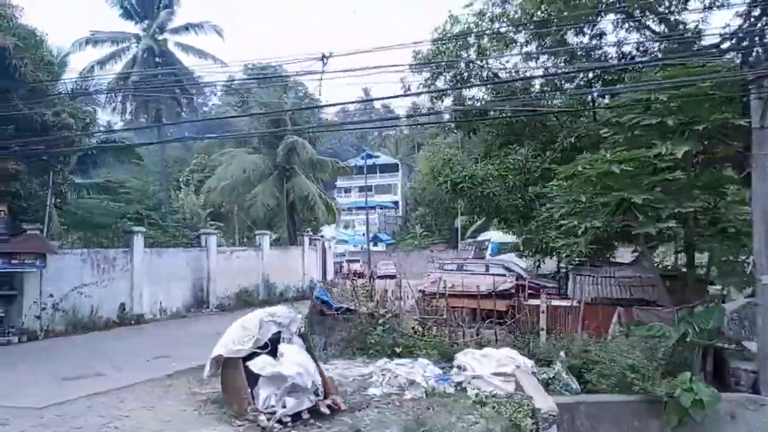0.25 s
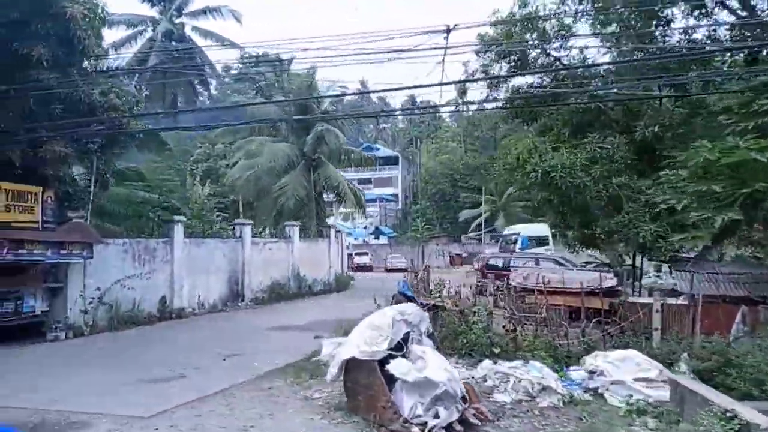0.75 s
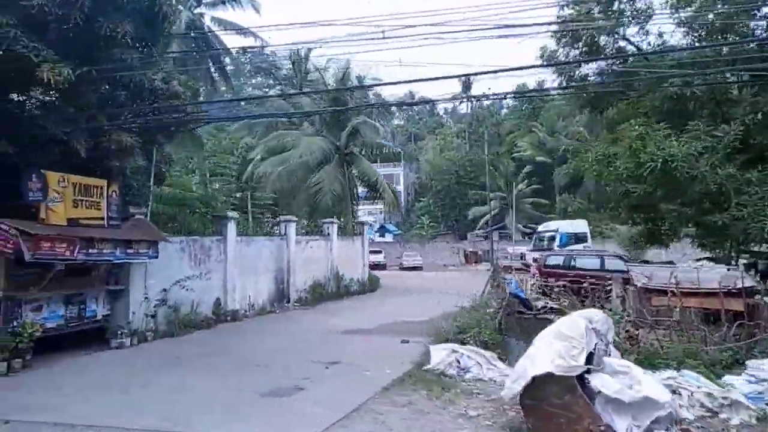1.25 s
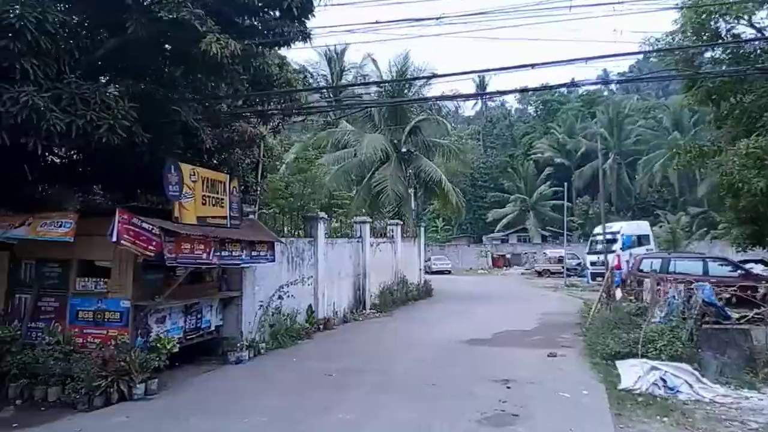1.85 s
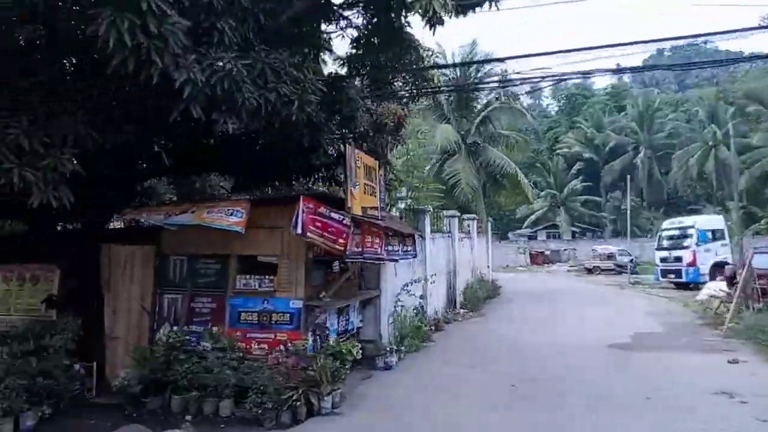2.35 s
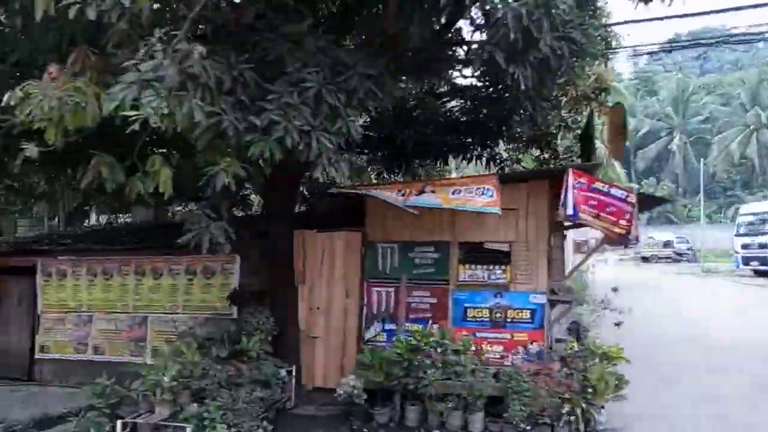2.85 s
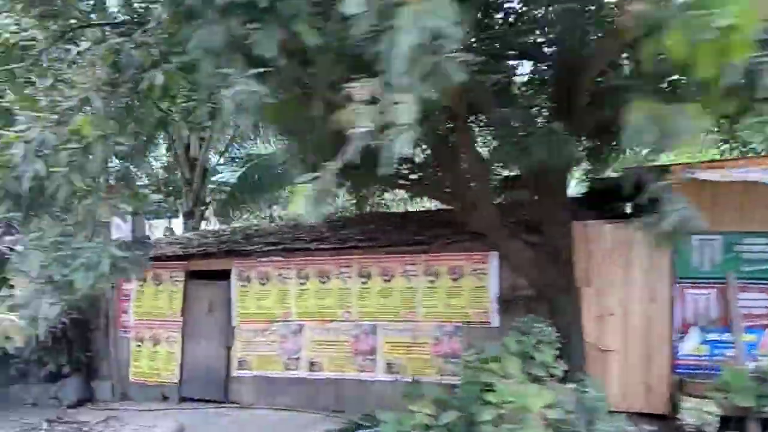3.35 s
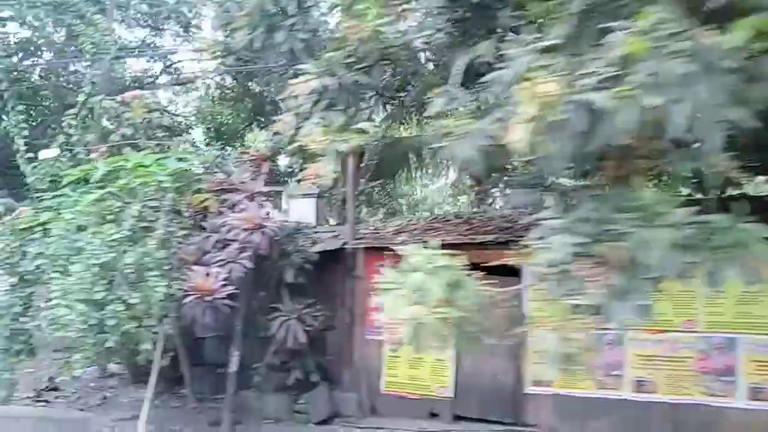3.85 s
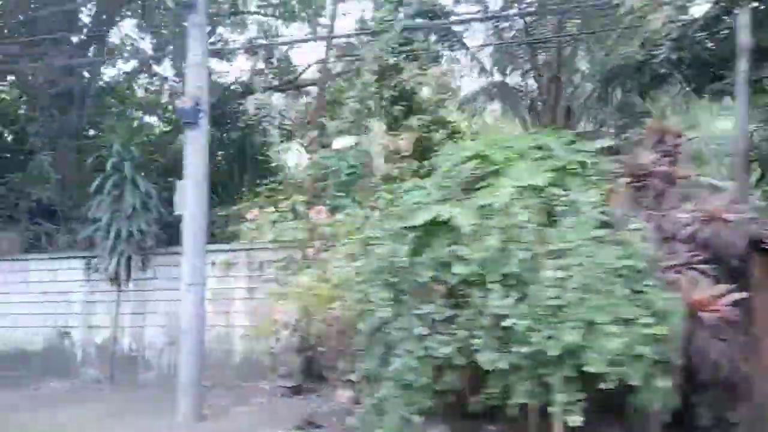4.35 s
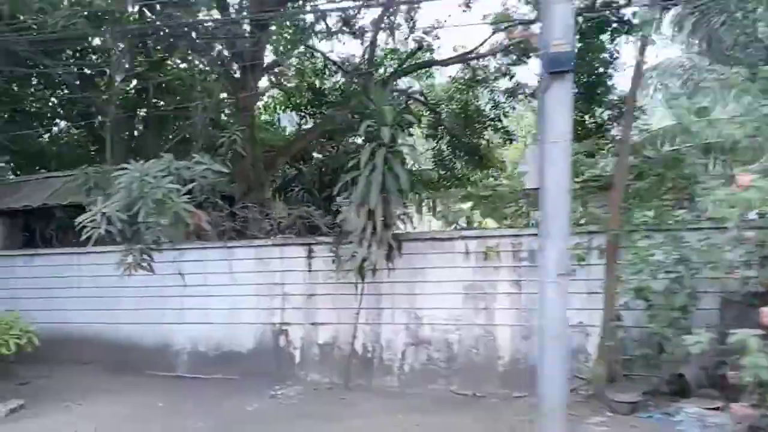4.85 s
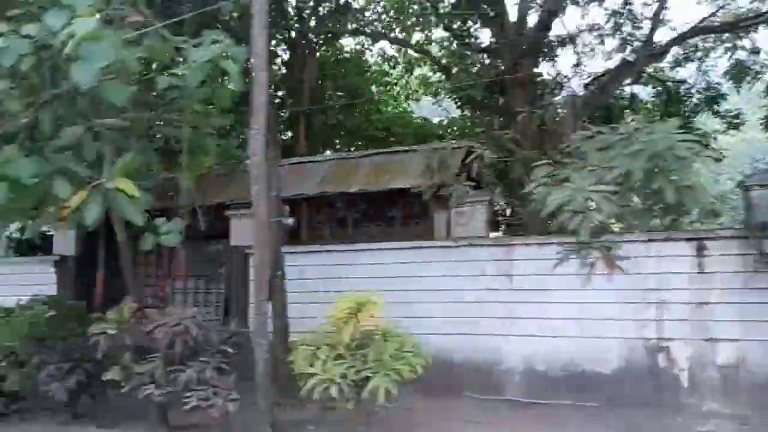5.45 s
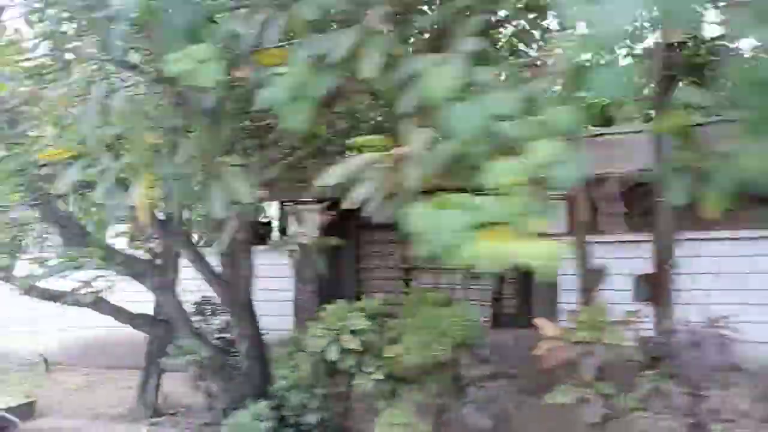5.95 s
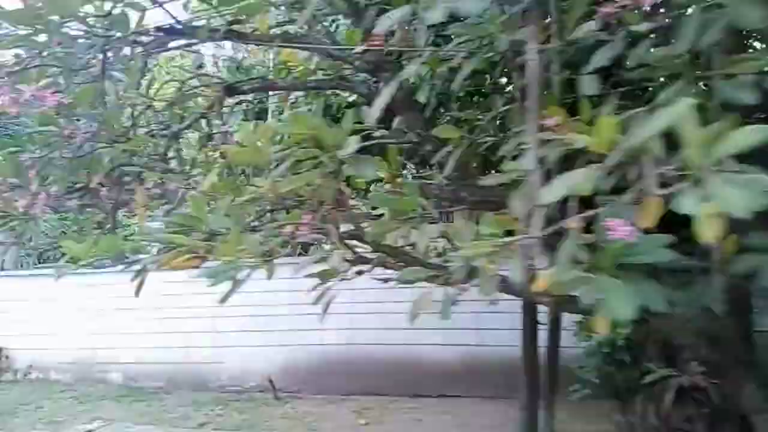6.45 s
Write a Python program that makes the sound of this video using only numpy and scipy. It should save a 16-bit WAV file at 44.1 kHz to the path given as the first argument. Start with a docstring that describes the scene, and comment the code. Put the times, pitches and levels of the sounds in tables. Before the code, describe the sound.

A close, slightly overloaded microphone rides on a motorbike outdoors. The engine's dull, rapid putter rises steadily in pitch, with metallic clatter over it. A two-note horn chirps once, then blares twice in fast succession, distorted, echoing off walls and foliage. Afterwards the engine swells back, fittings rattle, wind buffets in low lumps. In the last second the revs sag, a gust builds and thin squeaks appear.

```python
"""Motorbike and horn in a village bend

A single-cylinder motorbike gathers revs until the throttle closes near the end: exhaust orders, bodywork,
clatter and hiss all follow one firing rate. Two buzzing diaphragms give a short beep, then a double toot;
the walls echo them, and the recorder ducks its gain and overloads. Bumps ring the loose fittings, a few
thin squeaks come as the bike slows, and coloured noise in lumps buffets the microphone as wind.
"""
import sys
import numpy as np
from scipy import signal
from scipy.fft import rfft, irfft, next_fast_len
from scipy.io import wavfile
from scipy.ndimage import uniform_filter1d

SR = 44100
rng = np.random.default_rng(int(sys.argv[2]) if len(sys.argv) > 2 else 0)


def log_audio(samples):
    """Write samples as a 16-bit WAV file to the path given in sys.argv[1]."""
    # one column per channel
    frames = np.atleast_2d(samples).T
    # limit to full scale, then quantise
    limited = np.clip(frames, -1, 1)
    pcm = np.round(limited * 32767).astype(np.int16)
    wavfile.write(sys.argv[1], SR, pcm)


N = 295117
TIME = np.arange(N) / SR
START_HZ = 27.1  # firings per second at the start
SHUT_S = 5.86  # the throttle closes

# horn presses: (time [s], length [s], high horn [Hz], its relative level [dB], low horn [Hz],
# its relative level [dB], level of the boom at the high horn's fundamental [dB])
PRESSES = [(1.828, 0.026, 534, -2, 486.8, 0, -5), (2.601, 0.043, 527.7, 4, 469.7, 2.5, 13),
           (2.692, 0.053, 524.3, 3.5, 413.9, 0.5, 12)]


def from_db(db):
    """Decibels to an amplitude factor."""
    return 10 ** (np.asarray(db) / 20)


def rms_one(x):
    """The signal scaled to rms 1."""
    return x / np.sqrt(np.mean(x ** 2) + 1e-20)


def at_hz(points, hz):
    """A spectrum in dB read on a log-frequency axis."""
    point_hz, db = np.transpose(points)
    return np.interp(np.log(np.maximum(hz, 1)), np.log(point_hz), db)


def drift(rate_hz):
    """Slow chance with spread about 1: noise through two equal low-pass poles at the given corner."""
    step = 40  # samples between computed points
    r = np.exp(-2 * np.pi * rate_hz * step / SR)
    chance = rng.standard_normal(N // step + 2002)
    slow = signal.lfilter([1], [1, -2 * r, r * r], chance)[2000:]  # skip the filter's start-up
    return np.interp(np.arange(N) / step, np.arange(len(slow)), rms_one(slow))


def coloured(x, spectrum):
    """A signal given a smooth spectrum; rms 1."""
    size = next_fast_len(N + SR // 4)
    hz = np.arange(size // 2 + 1) * SR / size
    shaped = rfft(x, size) * from_db(at_hz(spectrum, hz))
    return rms_one(irfft(shaped, size)[:N])


def noise(spectrum):
    """Steady noise of the given colour; rms 1."""
    return coloured(rng.standard_normal(N), spectrum)


def resonance(x, hz, width_hz):
    """Two-pole band with gain about 1 on top."""
    r = np.exp(-np.pi * width_hz / SR)
    zeros = np.array([1, 0, -1]) * (1 - r * r) / 2
    poles = [1, -2 * r * np.cos(2 * np.pi * hz / SR), r * r]
    return signal.lfilter(zeros, poles, x + 1e-18)


def ring(clicks, hz, t60):
    """A unit click sets a decaying sine of starting height 1 ringing; it falls 60 dB in t60 seconds."""
    r = from_db(-60 / (t60 * SR))
    w = 2 * np.pi * hz / SR
    return signal.lfilter([0, np.sin(w)], [1, -2 * r * np.cos(w), r * r], clicks + 1e-18)


def swell(start, length, rise_s, fall_s):
    """A driven vibration builds up towards 1 while driven, then rings out."""
    age = np.maximum(TIME - start, 0)
    since_end = np.maximum(age - length, 0)
    return (1 - np.exp(-age / rise_s)) * np.exp(-np.minimum(since_end / fall_s, 50))


def revs():
    """Firings per second: an even climb in one gear and a quicker sag, rounded by the flywheel."""
    climb_hz_per_s, sag_hz_per_s, flywheel_s = 6.2, 25, 0.15
    climb = climb_hz_per_s * np.minimum(TIME, SHUT_S)
    sag = sag_hz_per_s * np.maximum(TIME - SHUT_S, 0)
    return uniform_filter1d(START_HZ + climb - sag, size=int(flywheel_s * SR), mode="nearest")


def ride_db(law):
    """Level of a sound that grows with the revs and drops as the throttle closes."""
    throttle_lag_s = 0.082
    # the rider briefly eases the throttle: (time [s], length [s], share closed [0-1])
    eases = [(1.955, 0.32, 0.35), (2.804, 0.37, 0.38), (4.2, 0.88, 0.29)]
    start_db, per_doubling_db, shut_db, die_s = law
    closed = sum(share * swell(s, length, throttle_lag_s, throttle_lag_s) for s, length, share in eases)
    closed = closed + 1 - np.exp(-np.maximum(TIME - SHUT_S, 0) / die_s)
    return start_db + per_doubling_db * np.log2(revs() / START_HZ) - shut_db * closed


def exhaust_note(firing_hz, phase, waver_db=2.5):
    """Each order of the firing rate swells as the rising revs carry it through a silencer resonance."""
    # exhaust through the silencer: (frequency [Hz], relative level of an order that falls there [dB])
    silencer = [(28, -60.5), (42, -33), (52, -26.5), (64, -28), (80, -27.5), (98, -21.5), (125, -24),
                (148, -37.5), (175, -28), (205, -30.5), (232, -35), (262, -31.5), (308, -27), (350, -46),
                (415, -33.5), (470, -37.5)]
    # strength of each order: (multiple of the firing rate [1], relative level [dB])
    order_mix = [(1, 1), (2, -0.5), (3, -2), (4, -9.5), (5, -8), (6, -5), (8, -3.5)]
    # ride law: (relative level at the starting revs [dB], rise per doubling of revs [dB],
    # loss with the throttle closed [dB], time constant of that loss [s])
    exhaust_law = (-1.5, 2.5, 11.5, 0.4)
    throttle_db = ride_db(exhaust_law)
    note = np.zeros(N)
    for k, db in order_mix:
        level_db = throttle_db + db + at_hz(silencer, k * firing_hz) + waver_db * drift(11.0)
        tone = np.sin(k * phase + rng.uniform(0, 2 * np.pi))
        note += np.sqrt(2) * from_db(level_db) * tone
    return note


def bodywork(cycles, uneven_db=1.0, knock_hz=2000):
    """Every firing, each a little uneven, gives a dull knock that rings silencer and bodywork; rms 1."""
    # silencer and bodywork modes: (frequency [Hz], width [Hz], relative level [dB])
    modes = [(186, 54, -15), (200, 65, -6), (270, 57, -3.5), (296.4, 23, 1), (422, 50, -5), (921, 35, -7.5),
             (1210, 100, -29)]
    firings = np.diff(np.floor(cycles), prepend=0) * from_db(uneven_db * drift(59))
    dull = signal.butter(2, knock_hz, fs=SR, output="sos")
    knocks = signal.sosfilt(dull, firings + 1e-18)
    return rms_one(sum((-1) ** k * from_db(db) * resonance(knocks, hz, width)
                       for k, (hz, width, db) in enumerate(modes)))


def engine(body_db=-0.5, clatter_db=2.5, throb=0.037, crank_throb=0.042, hiss_db=6.0):
    """Every firing pushes the exhaust, knocks the bodywork and sets off a burst of mechanical noise."""
    # colour of the clatter: (frequency [Hz], relative level [dB per Hz])
    clatter_colour = [(300, -8), (500, 1.5), (760, 0.5), (940, 2), (1150, 2.5), (1400, -2.5), (1900, -1),
                      (2400, -2), (3000, -8), (4000, -13), (4600, -24), (5400, -41), (8000, -59)]
    # colour of the hiss: (frequency [Hz], relative level [dB per Hz])
    hiss_colour = [(3000, -5), (5000, 2), (5500, -4.5), (6300, 1), (7200, -2), (8300, -5), (9000, -14.5),
                   (10000, -22.5), (13000, -25.5), (15500, -24)]
    # ride laws of body with clatter, and of hiss: (relative level at the starting revs [dB],
    # rise per doubling of revs [dB], loss with the throttle closed [dB], time constant of that loss [s])
    clatter_law = (-27.5, 2, 7, 0.24)
    hiss_law = (-64.5, 5.5, 8, 0.6)
    firing_hz = revs()
    cycles = np.cumsum(firing_hz * (1 + 0.00602 * drift(13.96))) / SR
    phase = 2 * np.pi * cycles
    # the crank turns twice for each firing, so the clatter throbs at both rates
    throbbing = np.exp(throb * np.cos(phase) + crank_throb * np.cos(2 * phase))
    bursts = rms_one(throbbing * from_db(0.85 * drift(25)))
    clatter = from_db(clatter_db) * noise(clatter_colour) * bursts
    # a jolt makes the machine clatter up to 4.5 dB louder for a moment
    load_db = ride_db(clatter_law) + 4.5 * swell(0.23, 0.046, 0.015, 0.022)
    mechanical = from_db(load_db) * (from_db(body_db) * bodywork(cycles) + clatter)
    hiss = from_db(ride_db(hiss_law) + hiss_db) * noise(hiss_colour) * bursts
    return exhaust_note(firing_hz, phase) + mechanical + hiss


def diaphragm(hz, pitch_bend, harmonics, jitter, flutter_db=1.85):
    """A buzzing horn disc: 26 harmonics whose period wanders as the contact breaker chatters."""
    cycles = np.cumsum(hz * pitch_bend * (1 + jitter * drift(155.4))) / SR
    grid = np.linspace(0, 1, 512)
    k = np.arange(1, 27)[:, None]
    lags = rng.uniform(0, 2 * np.pi, k.shape)
    partials = from_db(at_hz(harmonics, k * hz)) * np.sin(2 * np.pi * k * grid + lags)
    period = np.sum(partials, axis=0)
    return np.interp(cycles % 1, grid, period) * from_db(flutter_db * drift(70))


def horn(rise_s=0.0068, low_rise_s=0.013, fall_s=0.013, boom_rise_s=0.014, boom_fall_s=0.021,
         sharp=.012, settle_s=0.015, rasp_db=-5.0):
    """Two diaphragms start a little sharp and buzz together; the high one's boom outlasts the buzz."""
    # harmonics of the high and of the low horn: (frequency [Hz], relative level [dB])
    high_harmonics = [(525, -4.5), (1050, -7.5), (1580, -5), (2110, -3.5), (2640, -6), (3160, -13.5),
                      (3700, -24), (4220, -16), (5270, -46), (8000, -46), (14000, -76)]
    low_harmonics = [(420, -2), (830, -7), (970, 1.5), (1400, -2.5), (1900, -6), (2400, -9), (2950, -8.5),
                     (3900, -13), (4400, -23), (5300, -30), (9000, -55)]
    # buzz of the contact breaker, heard as rasp: (frequency [Hz], relative level [dB per Hz])
    rasp_colour = [(500, -15), (1050, -6), (1600, -4), (2300, -3.5), (3200, -6), (4300, -21), (5400, -39),
                   (8000, -43), (14000, -62)]
    high, low, boom = np.zeros((3, N))
    rasp = from_db(rasp_db) * noise(rasp_colour)
    for s, length, high_hz, high_db, low_hz, low_db, boom_db in PRESSES:
        pitch_bend = 1 + sharp * np.exp(-np.clip((TIME - s) / settle_s, 0, 20))
        high_buzz = diaphragm(high_hz, pitch_bend, high_harmonics, jitter=0.01036) + rasp
        low_buzz = diaphragm(low_hz, pitch_bend, low_harmonics, jitter=0.018)
        fundamental = np.sin(2 * np.pi * np.cumsum(high_hz * pitch_bend) / SR)
        high += from_db(high_db) * swell(s, length, rise_s, fall_s) * high_buzz
        low += from_db(low_db) * swell(s, length, low_rise_s, fall_s) * low_buzz
        boom += from_db(boom_db) * swell(s, length, boom_rise_s, boom_fall_s) * fundamental
    return high, low, boom


def plunger(level_db=-7.5, lag_s=0.00397):
    """The first three hard knocks of each press, one per cycle, ring the horn's disc and housing."""
    # modes of disc and housing: (frequency [Hz], relative level [dB], 60 dB decay time [s])
    disc_modes = [(1008, 0.5, 0.08), (1083, 4, 0.13), (1383, 8.5, 0.11), (1660, -1, 0.066),
                  (2204, -0.5, 0.23)]
    knocks = np.zeros(N)
    for s, _, high_hz, high_db, *_ in PRESSES:
        at = ((s + lag_s + np.arange(3) / high_hz) * SR).astype(int)
        knocks[at] = from_db(high_db + level_db)
    return sum((-1) ** k * ring(from_db(db) * knocks, hz, t60)
               for k, (hz, db, t60) in enumerate(disc_modes))


def roadside(x, tail_db=-4.0, t60=0.45, bend_db=-9.0, smear_s=0.00012):
    """Walls throw back a few echoes, foliage a diffuse tail; both weaken once the bike has turned away."""
    # walls and house fronts: (delay [s], level [dB])
    walls = [(0.016, -18), (.043, -12), (.071, -15), (.098, -12.5), (.121, -16.5)]
    t = np.arange(SR) / SR
    response = rng.standard_normal(SR) * from_db(-60 * t / t60) * (1 - np.exp(-t / 0.014))
    response *= from_db(tail_db) / np.linalg.norm(response)
    for delay, db in walls:
        response[int(delay * SR)] += from_db(db)
    facing = from_db(np.interp(TIME, [2.0, 2.5], [0, bend_db]))
    returned = signal.fftconvolve(x * facing, response)[:N]
    # the echo paths stretch and shrink as the bike moves, which blurs the pitch
    return np.interp(TIME + smear_s * drift(22), TIME, returned)


def rattles(level_db=13.5, chatter_s=0.0048):
    """Bumps set off brief bursts of tiny contacts that ring the fittings; rough patches keep them going."""
    # ticks over sharp bumps: (time [s], relative level [dB])
    ticks = [(0.5197, -41), (1.6402, -38), (3.3917, -35), (4.0801, -32.5), (4.9896, -39), (5.0888, -37),
             (6.0791, -31.5), (6.1574, -35), (6.4994, -40), (6.5765, -37)]
    # modes of the loose fittings: (frequency [Hz], relative level [dB], 60 dB decay time [s])
    fittings = [(2331, -10, .008), (3040, 3.5, 0.0054), (3920, 0, 0.01), (4410, -9, 0.011),
                (6240, -14, 0.0053), (6940, -19, 0.0053), (7660, -19.5, 0.0054)]
    # rough patches: (time [s], length [s], relative level [dB])
    shakes = [(3.40, 0.044, -49), (4.057, 0.07, -49.5)]
    # fainter ticks come at random: 4 per second on average, level spread 3.5 dB
    struck = rng.random(N) < 4 / SR
    bumps = struck * from_db(-44 + 3.5 * rng.standard_normal(N))
    for s, db in ticks:
        bumps[int(s * SR)] = from_db(db)
    r = np.exp(-1 / (chatter_s * SR))
    chatter = from_db(level_db) * signal.lfilter([np.sqrt(1 - r * r)], [1, -r], bumps + 1e-18)
    shaking = sum(from_db(db) * swell(s, length, 0.01, 0.015) for s, length, db in shakes)
    contacts = (chatter + shaking) * rng.standard_normal(N)
    return sum((-1) ** k * ring(from_db(db) * contacts, hz, t60)
               for k, (hz, db, t60) in enumerate(fittings))


def brake(waver=0.017):
    """Thin squeaks as the bike slows: short sines of unsteady pitch."""
    # faint squeaks: (time [s], length [s], frequency [Hz], level [dB])
    squeaks = [(5.86, 0.085, 11900, -61), (5.94, .14, 11460, -60), (6.132, 0.06, 11450, -62),
               (6.593, 0.032, 5075, -43), (6.634, 0.025, 3100, -28)]
    total = np.zeros(N)
    for s, length, hz, db in squeaks:
        cycles = np.cumsum(hz * (1 + waver * drift(150))) / SR
        total += from_db(db) * swell(s, length, 0.031, 0.01) * np.sin(2 * np.pi * cycles)
    return total


def wind(gust_rumble_db=-2.5, gusty_db=0.6, lumps_db=1.5, level_db=-.5, buffet_rise_s=0.0033,
         buffet_fall_s=0.0074, hard_db=3.5):
    """Eddies break on the microphone port in quick lumps; harder gusts also sound brighter."""
    # colour of the wind: (frequency [Hz], relative level [dB per Hz])
    coarse_colour = [(20, -35), (50, -10.5), (85, 3), (130, 4.5), (200, 0), (320, 0.5), (430, -6.5),
                     (600, -10.5), (900, -27.5), (1800, -45), (4000, -71.5), (10000, -87)]
    # colour of the finer eddies that hard gusts raise: (frequency [Hz], relative level [dB per Hz])
    fine_colour = [(25, -40), (120, -12.5), (300, 10.5), (550, -2), (900, -12), (1800, -33.5), (4000, -53),
                   (10000, -86)]
    # the hardest buffets: (time [s], length [s], relative level [dB])
    buffets = [(3.4, 0.03, -13.5), (3.685, .073, -15.5), (4.231, 0.13, -20.5), (4.479, 0.025, -13.5),
               (4.537, .046, -13.5), (4.888, 0.064, -14.5), (5.474, 0.034, -13), (6.317, 0.066, -14),
               (6.474, 0.037, -18)]
    # ride law: (relative level at the starting revs [dB], rise per doubling of revs [dB],
    # loss with the throttle closed [dB], time constant of that loss [s])
    breeze_law = (-23.5, 5.5, 8, 1.5)
    breeze = from_db(ride_db(breeze_law) + gusty_db * drift(2.6))
    # one long gust builds near the end and drops away quickly
    gust = from_db(-12.5) * swell(5.9, 0.657, rise_s=0.11, fall_s=.02)
    power = breeze ** 2
    for s, length, db in buffets:
        power += (from_db(db) * swell(s, length, buffet_rise_s, buffet_fall_s)) ** 2
    lumps = from_db(lumps_db * drift(40))
    coarse = coloured(rng.standard_normal(N) * lumps, coarse_colour)
    fine = coloured(rng.standard_normal(N) * lumps, fine_colour)
    rumble = from_db(level_db) * np.sqrt(power + (from_db(gust_rumble_db) * gust) ** 2) * coarse
    # the fine eddies grow with the square of the wind's strength
    return rumble + from_db(hard_db) * (power + gust ** 2) * fine


def scene(high_echo_db=1.5, low_echo_db=2.0, beam_hz=1300):
    """The ride; the horns beam their upper harmonics forward, so their echoes come back thin and bright."""
    high, low, boom = horn()
    forward = signal.butter(1, beam_hz, "high", fs=SR, output="sos")
    beam = signal.sosfilt(forward, from_db(high_echo_db) * high + from_db(low_echo_db) * low)
    horns = high + low + boom + plunger() + roadside(beam)
    return (engine() + horns + rattles() + brake() + wind())[None]


def gain_control(x, threshold_db=-16.5, range_db=14.0, release_db_per_s=78.5, ahead_s=0.006):
    """Loud sound above 600 Hz turns the gain down slightly ahead of time; it recovers at a steady rate."""
    sensed = signal.sosfilt(signal.butter(2, 600, "high", fs=SR, output="sos"), x[0])
    level_db = 10 * np.log10(np.maximum(uniform_filter1d(sensed ** 2, size=256), 1e-12))
    cut_db = np.clip(level_db - threshold_db, 0, range_db)
    # the deepest cut so far, eased off by the release
    released_db = release_db_per_s * TIME
    held_db = np.maximum.accumulate(cut_db + released_db) - released_db
    smooth_db = uniform_filter1d(held_db, size=256)
    return x * from_db(-np.interp(TIME + ahead_s, TIME, smooth_db))


def record(dry):
    """The recorder's gain control, overload with flat tops, and the top cut."""
    x = gain_control(dry)
    clipped = x / (1 + (x / .92) ** 8) ** (1 / 8)
    # 70 dB down from 16350 Hz upward
    top_cut = signal.cheby2(14, 70, 16350, fs=SR, output="sos")
    return signal.sosfilt(top_cut, clipped)


dry = scene()
out = record(dry)
log_audio(out)
```